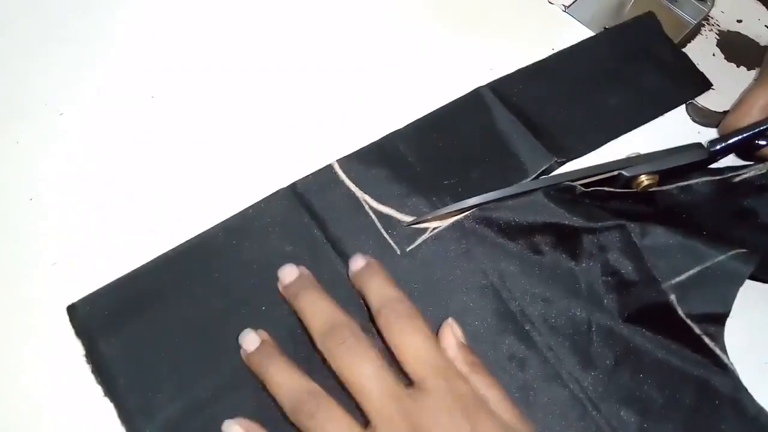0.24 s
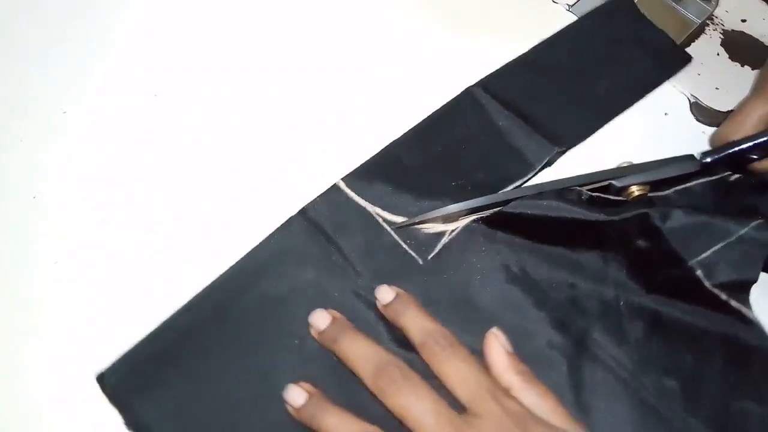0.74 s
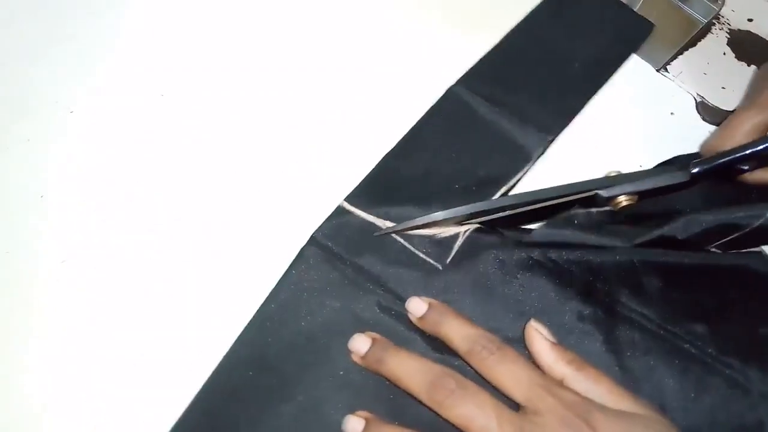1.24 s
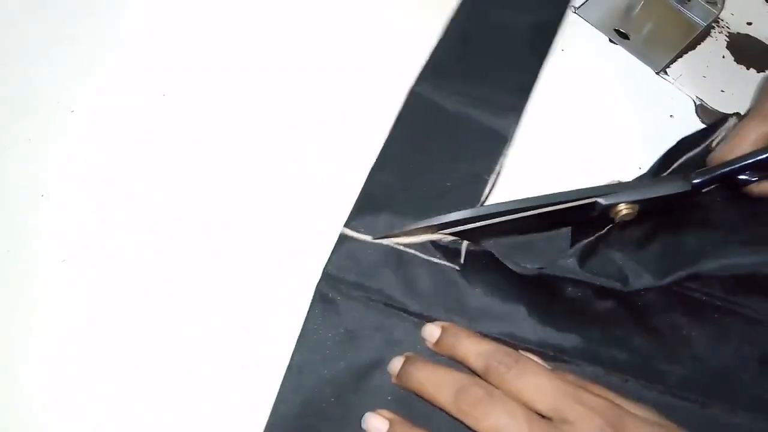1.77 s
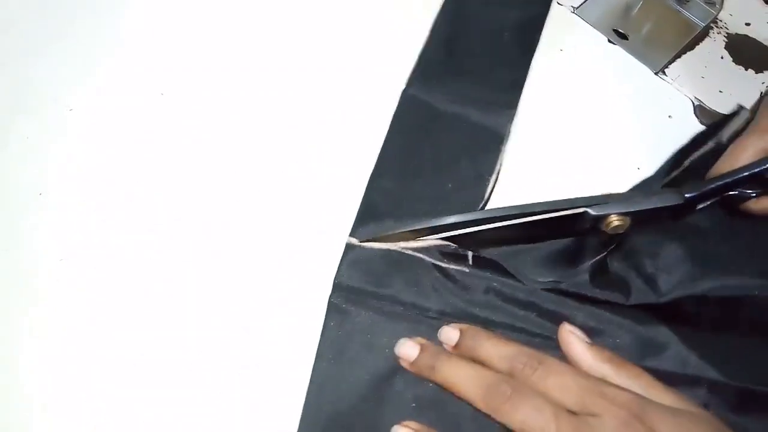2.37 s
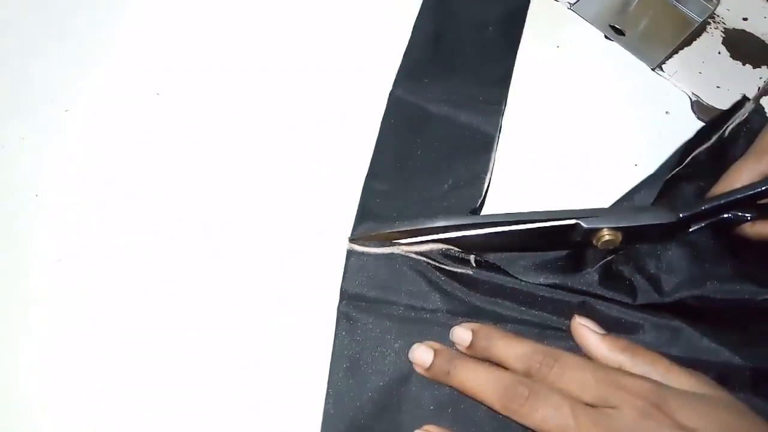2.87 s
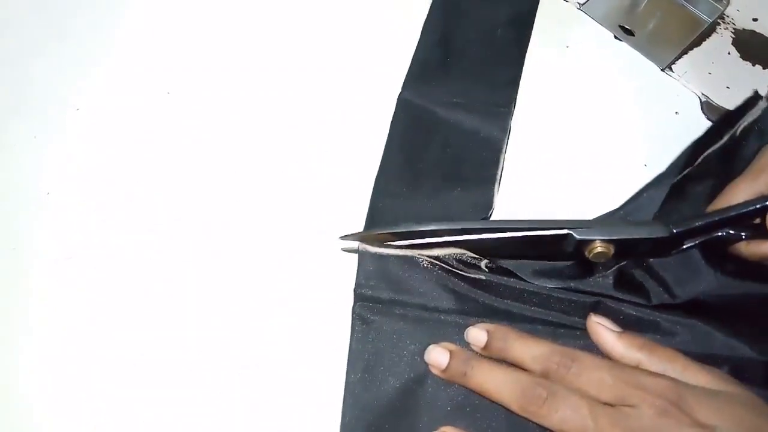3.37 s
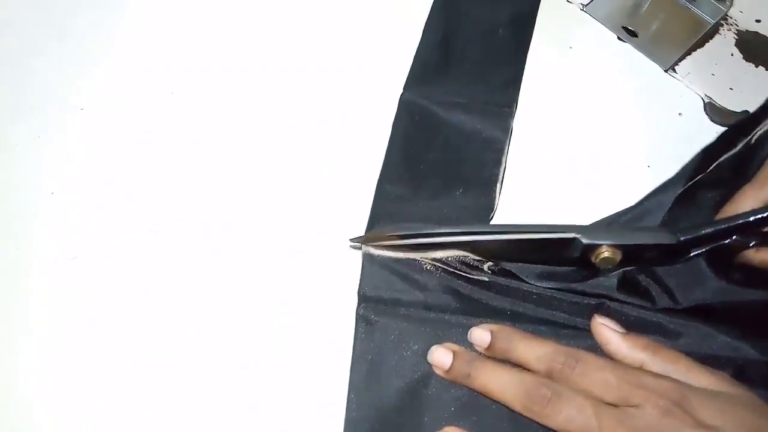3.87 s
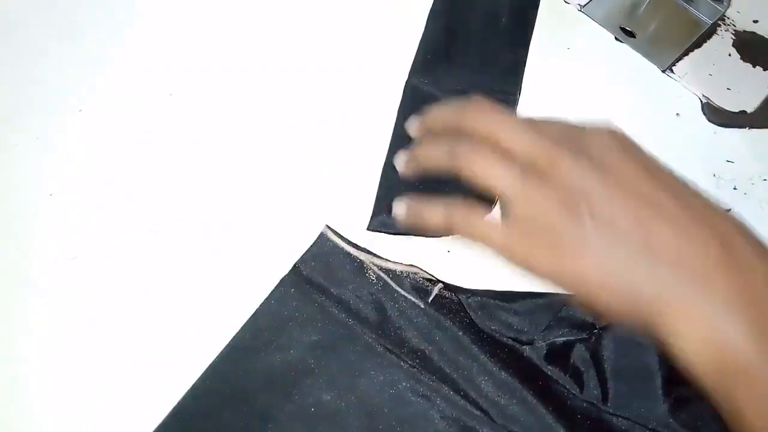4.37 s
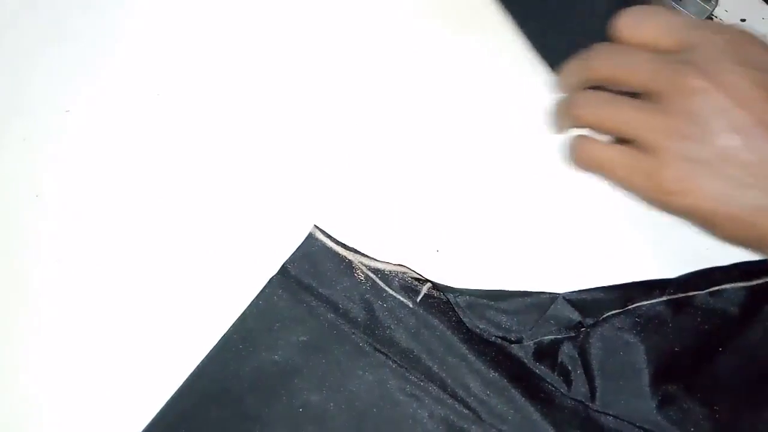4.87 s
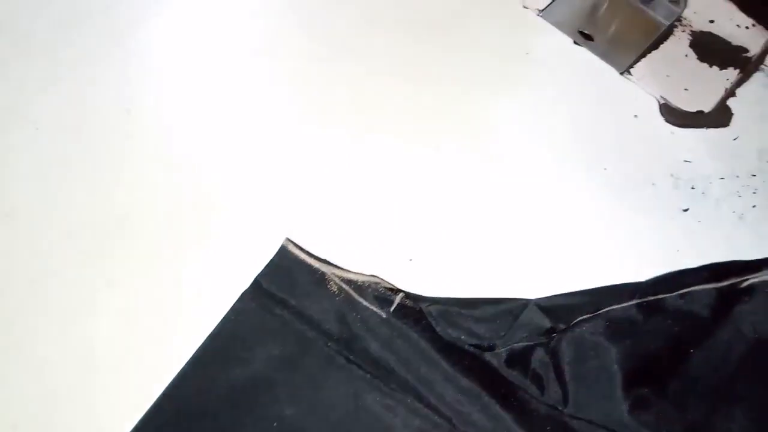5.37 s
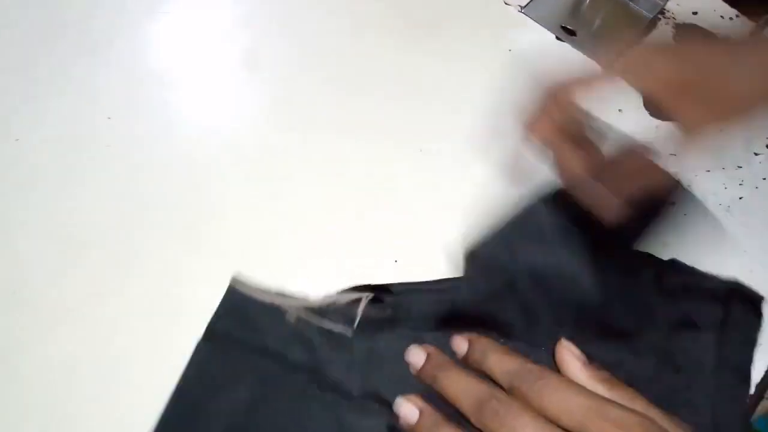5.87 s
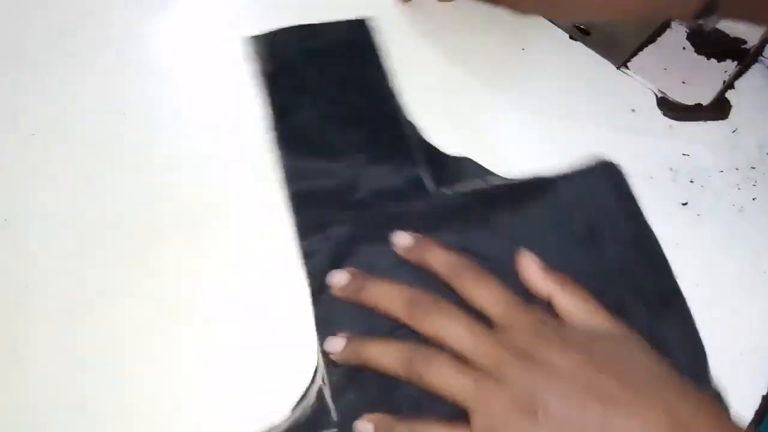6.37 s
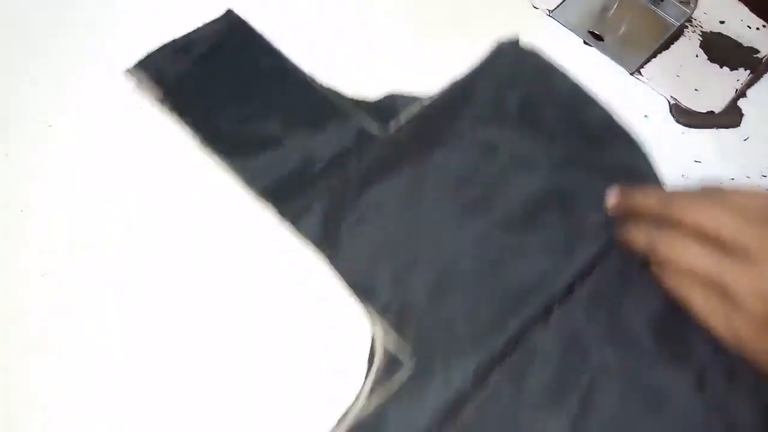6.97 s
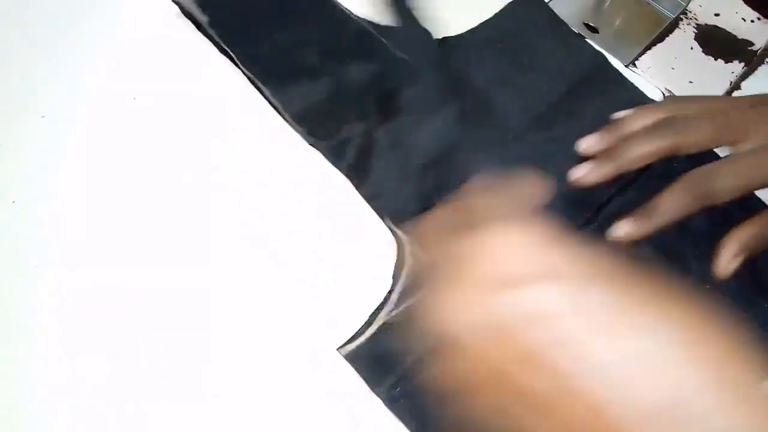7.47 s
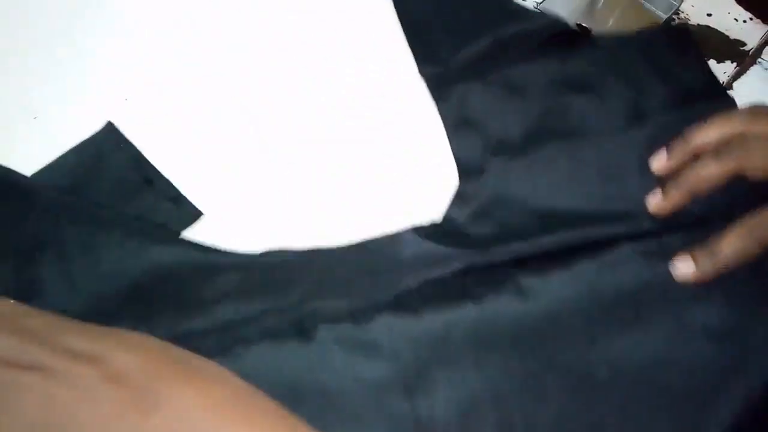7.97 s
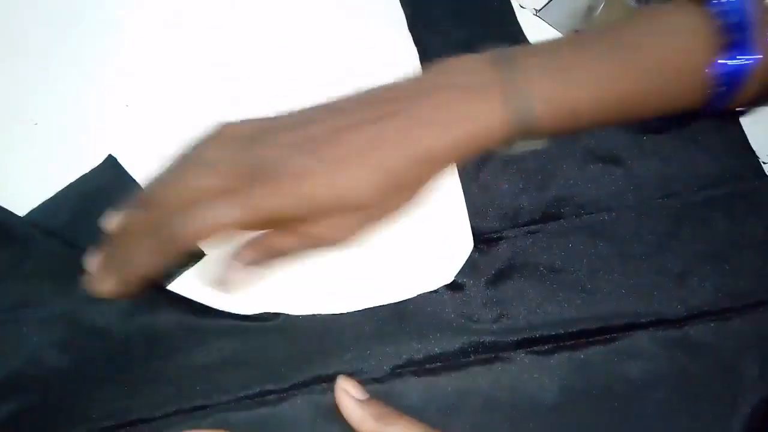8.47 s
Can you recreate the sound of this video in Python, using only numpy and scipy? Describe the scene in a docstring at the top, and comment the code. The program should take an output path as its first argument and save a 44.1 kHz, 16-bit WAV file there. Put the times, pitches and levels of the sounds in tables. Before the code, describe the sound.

A very quiet small room, heard close to a hard table. From about 0.2 s, heavy shears crunch faintly through cloth; further short gritty bursts come near 0.8-1.0, 1.4-1.6, 2.1-2.25 and 2.7-2.8 s, gradually firmer, with light cloth rubs between. From 3.3 s the bites are stronger and more widely spaced, with low blade scraping, until crisp final snips and a snap at 3.9 s and a small springing tick at 4.0. Cloth slides softly; bangles tick at 4.6 and metal clicks at 4.8. At 5.0-5.2 s the shears clatter down, loud, steely and bouncing. After a pause, soft pats and rustles begin near 6 s, with bright short bangle clinks at 6.3 and 6.75-6.8. A hard knock and rapid rattle hit the table at 7.1-7.2 s. Quiet cloth smoothing follows, a sharp bangle clink at 8.3, then a last soft rub.

```python
"""Over faint room tone, tailor's shears crunch through cloth: grains of thread noise excite the blade resonances.
Soft pats, dull knocks and the friction noise of cloth and blade on the table come between.
Bangles clink as decaying modes; the shears clatter down as impacts that ring steel and table modes.
Then hands turn and smooth the cloth, bangles clink again and something hard is nudged across the table top.
A small room adds diffuse reflections."""
import sys
import numpy as np
from scipy import signal
from scipy.fft import rfft, irfft, next_fast_len
from scipy.io import wavfile
from scipy.ndimage import uniform_filter1d

SR = 44100
rng = np.random.default_rng(int(sys.argv[2]) if len(sys.argv) > 2 else 0)


def wav_out(sig):
    """Save sig, one row per channel (or a flat mono array), as 16-bit PCM at SR to the path in sys.argv[1]."""
    wavfile.write(sys.argv[1], SR, np.round(np.clip(np.atleast_2d(sig).T, -1, 1) * 32767).astype(np.int16))


N = 385434  # samples

# Room tone: pitch_hz, level_db
AIR_SPECTRUM = [(12, -37.5), (20, -7), (49, 3), (103, -13.5), (185, -9), (274, -15.5), (362, -10.5),
                (478, -15.5), (686, -16), (834, -18.5), (1270, -17.5), (2760, -26), (4190, -28),
                (9930, -29.5), (15500, -47)]
AIR_DB = -67
# Decay of the room by band: pitch_hz, t60_s
ROOM_DECAY = [(100, .25), (400, .32), (1400, .3), (3000, .29), (7000, .33), (14000, .23)]
CUTOFF_HZ = 15600

# Runs of small bites as the shears close: start_s, end_s, small_bite_level_db (mean at mid run);
# big bites may follow a run
SMALL_BITE_RUNS = [(0.19, 0.311, -68), (0.83, 1.02, -54), (1.394, 1.6, -54), (2.06, 2.26, -50),
                   (2.681, 2.825, -47), (3.265, 3.38, -43.5)]
# Big bites through a thick bundle of threads: time_s, level_db, treble_db (before the tilt scale in bite)
BIG_BITES = [(0.1958, -46, -4), (0.2375, -51.5, -11), (0.266, -50.5, -10), (0.293, -48, -15),
             (0.835, -46.5, -6), (0.848, -48.5, -24), (0.9027, -50, -10), (0.9428, -40, -11),
             (0.986, -45.5, -5), (1.0115, -41.5, -4), (1.4195, -52.5, -9), (1.4747, -47, -9),
             (1.576, -42.5, -4.5), (1.5913, -46.5, -12), (1.6174, -39.5, -8), (1.6416, -50.5, -19),
             (2.1067, -43.5, -8), (2.198, -44.5, -7), (2.217, -40.5, -1), (2.248, -44, -11),
             (2.6884, -47.5, -19), (2.7162, -45.5, -14), (2.75, -45, -5), (2.7837, -42.5, -8),
             (2.82, -45, -6), (3.27, -36.5, -25), (3.347, -38, -9), (3.3994, -36.5, -1.5),
             (3.467, -36.5, 0.5), (3.711, -38, -4), (3.763, -46, -3), (3.861, -38.5, 0), (3.893, -35, 15),
             (3.949, -36, 5)]
# Blade resonances, changing as the crossing runs to the tips: pitch_hz, width_hz, open_db, shut_db
BLADE_MODES = [(680, 110, -1, -2), (1260, 40, 6.5, -3), (1425, 70, 13, 8), (1560, 40, -5, -5),
               (2360, 140, -15, -9), (4633, 110, 1, -2), (5170, 120, -1, -2.5), (5900, 80, -7, -17),
               (7730, 190, -1, -18), (8190, 220, -2, -15.5), (9100, 190, -24, -6), (9420, 600, -14.5, -10),
               (10500, 160, -28, 1), (13450, 170, 5.5, -21)]
# Parting threads: pitch_hz, level_db
CRUNCH_SPECTRUM = [(59, -66), (100, -11), (250, -9), (390, 1), (541, -18), (682, 7), (1020, -12.5),
                   (1460, 0), (1920, -16), (3390, -17), (4560, -6.5), (6810, -13), (10600, -5.5),
                   (15500, -62)]
SMALL_BITES_PER_S, SMALL_HALF_S, SMALL_TREBLE_DB = 60, .0075, -11
BIG_HALF_S = 0.005
SQUEEZE_DB, SCATTER_DB = 2, 2  # small bites: growth as the grip tightens over a run; chance spread

# Pats of hand and cloth on the table: time_s, level_db
PATS = [(0.2, -56), (2.22, -56), (4.612, -52), (6.025, -49), (6.294, -51), (6.315, -55), (6.743, -51.5),
        (6.812, -53), (6.855, -52), (7.224, -39), (8.27, -53), (8.31, -54)]
# Puff of a pat: pitch_hz, level_db
PAT_SPECTRUM = [(40, -4), (110, -5), (330, 0), (550, -4.5), (1200, -13.5), (4000, -33)]

# Dull knocks on the table top: time_s, level_db, upper_mids_db (against the lows), table_thump_db
KNOCKS = [(0.483, -60.5, -4, -5), (3.962, -41, -12, -14), (6.002, -48, -2, -22), (6.396, -50.5, -3, -20),
          (6.5, -44, -6, -19.5), (6.703, -52, 0, -5), (7.118, -22, -4, -20), (7.147, -39, 2, -26),
          (7.163, -27.5, 4, -28), (7.1705, -29, 6, -24), (7.193, -33, 4, -28), (7.201, -31, 4, -26),
          (7.216, -38, 8, -20), (7.223, -36, -3, -15)]
# Modes rung by a knock on the table: pitch_hz, level_db, t60_s
BOARD_MODES = [(580, -20, 0.15), (1170, -12, 0.033), (1330, -6, 0.037), (2500, 5, 0.012), (2950, 3, .012)]
# Dense body of a knock: pitch_hz, level_db
KNOCK_SPECTRUM = [(47, -36.5), (80, -31), (833, 4), (1110, -3), (2440, 1), (2900, -4), (3940, -9.5),
                  (5720, -20), (9270, -36), (15000, -78)]
# Low modes of the table top: pitch_hz, level_db, t60_s
TABLE_MODES = [(120, -16, .28), (178, -15, .24), (320, -12, .06), (470, -6, .05), (552, -1, .08),
               (620, -3, .045)]
# Edge click, metal on metal: pitch_hz, level_db
EDGE_SPECTRUM = [(500, -21.5), (3000, -14.5), (6000, -7.5), (9000, -3), (12000, -6), (15500, -16)]
# Light clicks of the shears in the hand: time_s, level_db
CLICKS = [(4.817, -29), (5.004, -34.5)]
# Modes of the shears in the hand: pitch_hz, level_db, t60_s
HANDLE_MODES = [(1760, 0, 0.035), (2464, 2, 0.03), (3300, 1.5, 0.032), (6600, -6, .05), (8900, -7, .06),
                (9800, -7, .1)]
# Dense body of the blades springing apart: pitch_hz, level_db
TICK_SPECTRUM = [(300, -11), (2400, -5), (3700, -6), (5000, -6), (8000, 1), (10500, -8), (13000, -25)]
# Hollow note of a handle loop on the table: pitch_hz, level_db, t60_s
HOLLOW_MODES = [(613, 0, 0.048)]
SHUT_S, SHUT_DB = 3.9415, -32  # the blades snap shut at the end of the cut
RELEASE_S, RELEASE_DB = 4.011, -36.5  # the blades spring apart after the last cut
THUNK_S, THUNK_DB = 5.0095, -32.5  # a handle loop touches the table

# Hands slide cloth over the table: fastest_s, rise_s, fall_s, rub_db, hiss_db (both before the trim in cloth)
SLIDES = [(1.25, 0.17, 0.17, -67.5, -73), (1.788, .01, .015, -72, -60), (1.97, .12, .2, -54, -62),
          (2.07, 0.14, .08, -59.5, -59.5), (3.003, .01, .015, -68, -66), (4.1, .1, 0.19, -74, -67),
          (4.42, 0.26, 0.52, -65, -83), (4.482, 0.017, 0.014, -49.5, -60), (5.73, .05, .2, -80, -72.5),
          (6.0, 0.19, 0.22, -59, -60), (6.028, 0.016, 0.01, -52.5, -52), (6.184, 0.009, 0.016, -67, -62),
          (7.02, 0.18, 0.27, -70, -67.5), (7.36, 0.052, .08, -63, -64.5), (7.52, 0.23, 0.21, -65.5, -83),
          (7.66, 0.089, 0.094, -64.5, -57), (7.89, .04, .08, -67, -70), (8.01, .2, .2, -67, -71),
          (8.69, 0.19, .17, -59.5, -59.5)]
# Soft rub on the table: pitch_hz, level_db
RUB_SPECTRUM = [(59, -48), (100, -16.5), (230, -13), (260, -4), (313, -4.5), (475, -1.5), (1300, -12.5),
                (1510, -8), (4000, -24), (5200, -51.5), (8800, -120)]
# Fizz of the weave: pitch_hz, level_db
HISS_SPECTRUM = [(1470, -35.5), (2500, -8.5), (3050, -12.5), (4750, -3.5), (5660, -6), (7740, -6),
                 (10500, -8.5), (12200, -16), (15500, -9)]
GLIDE_DB = 20  # a sliding sound gains this much over its rise and loses it over its fall

# The weave zips at a pitch set by its speed: centre_s, level_db, pitch_hz, half_length_s
ZIPS = [(1.25, -69, 1400, .04), (1.98, -59, 560, .045), (2.025, -55, 7500, 0.055), (7.566, -61, 463, 0.029),
        (7.667, -65, 6440, 0.017)]

# The lower blade pushed along the table: hardest_s, rise_s, fall_s, boom_db, scrape_db (before the trim in dragging)
DRAGS = [(1.99, .2, .35, -61, -63), (2.206, .04, 0.061, -59, -53.5), (2.79, 0.084, .08, -62, -60),
         (3.21, .03, .15, -63, -68), (3.3, .06, 0.14, -48.5, -53.5), (3.41, 0.074, 0.11, -55, -41),
         (3.625, 0.035, 0.074, -43.5, -45.5), (3.71, 0.074, 0.24, -49, -49.5),
         (3.9, 0.039, 0.018, -44, -43.5), (3.947, 0.011, 0.078, -49, -47.5)]
# Soft boom of the table: pitch_hz, level_db
BOOM_SPECTRUM = [(15, -20.5), (40, -1), (60, 2.5), (90, -5), (150, -22), (400, -50)]
# Scrape of the blade: pitch_hz, level_db
SCRAPE_SPECTRUM = [(60, -13), (160, -1), (450, -3), (800, -11.5), (1500, -13), (2500, -23.5), (6000, -35),
                   (15000, -48)]

# Bangles graze each other: time_s, level_db, small_share (0-1), contact_half_s, rattle_db (contact)
CLINKS = [(4.613, -37.5, 0, 0.0024, 2), (4.644, -51.5, .05, 0.0026, -3), (6.242, -51.5, 0.1, 0.0026, 2),
          (6.2925, -23.5, 0.02, 0.0027, 1), (6.577, -43, 0.02, 0.0022, 15), (6.714, -52, .6, 0.0013, 14),
          (6.736, -37, 1, 0.0025, 3), (6.747, -26.5, .7, 0.0021, 21), (6.808, -26, 0.01, 0.003, -6),
          (6.817, -37, 0, 0.0029, 2), (6.836, -46, .1, .002, 0), (8.192, -56, 0.84, 0.0041, 12),
          (8.269, -25, 0.95, 0.0026, 0), (8.280, -21, 0.97, 0.0017, -8), (8.285, -24, 0.96, 0.0061, 0)]
# Modes of the larger bangles, before mismatch: pitch_hz, level_db, t60_s
LARGE_BANGLE_MODES = [(1950, -19, .03), (5180, -15, .035), (6080, -11, .04), (6940, -16, .04),
                      (9350, -12, .04), (9800, -6, .045), (10050, -6, .045), (10480, -8, .04),
                      (11150, -8, .04), (11620, 0, .045), (15100, -15, .03)]
# Modes of the smaller bangles, before mismatch: pitch_hz, level_db, t60_s
SMALL_BANGLE_MODES = [(2400, -18, .03), (5050, -26, .04), (6100, -20, .04), (6620, -15, .06),
                      (7030, -11, .09), (8420, -6, .04), (9300, -14, .04), (11000, -12, .06),
                      (12150, -6, .05), (12780, 3, .075), (13380, 1, .07), (15100, -1, .045)]

# Steel lands and bounces: time_s, level_db, edge_click_db, ring_db (last two against the dense body)
CLATTER = [(5.0757, -11, 2.5, -7), (5.0915, -18, -14, 10), (5.1015, -24, -14, 5), (5.1300, -7.5, -7, 5),
           (5.1355, -18, -5, -10), (5.1808, -4.5, 0, 6), (5.2024, -13.5, -16, 14), (5.2098, -20, -18, 6),
           (5.2225, -25, -18, 4)]
# Modes of the shears, damped by the table: pitch_hz, level_db, t60_s
STEEL_MODES = [(900, -16, .035), (1166, -12, .04), (1600, -13, .03), (1830, -11, .03), (2560, -5, .016),
               (2810, 1, .018), (2980, 0, .018), (3180, -3, .016), (3700, -9, .018), (8900, -22, .05),
               (11250, -22, .05), (11950, -22, .05)]
# Dense modes of shears and table: pitch_hz, level_db
LANDING_SPECTRUM = [(35, -46), (60, -19), (180, -24), (230, -24), (533, -11), (1290, -9), (1790, -3),
                    (2360, -8), (2840, -10), (4800, -12), (6000, -18), (9080, -35), (12300, -23),
                    (15500, -38)]


def amp(db):
    """The decibel law: level to amplitude ratio."""
    return 10 ** (np.asarray(db) / 20)


def unit(x):
    """Normalisation to rms 1."""
    return x / np.sqrt(np.mean(x ** 2) + 1e-20)


def read(points, hz):
    """Interpolation: straight lines between the points over log frequency."""
    point_hz, value = np.transpose(points)
    return np.interp(np.log(hz + 1), np.log(point_hz + 1), value)


def add(mix, s, sound):
    """Superposition: sums a sound into the mix from time s."""
    part = mix[max(round(s * SR), 0):][:len(sound)]
    part += sound[:len(part)]


def colour(x, spectrum):
    """Linear filtering: weights x by a spectrum, then brings it to rms 1."""
    size = next_fast_len(len(x))
    gain = amp(read(spectrum, np.fft.rfftfreq(size, 1 / SR)))
    return unit(irfft(rfft(x, size) * gain, size)[:len(x)])


def noise(spectrum, size):
    """Filtered Gaussian noise at rms 1."""
    return colour(rng.standard_normal(size), spectrum)


def grains(per_s, spread_db, size):
    """Shot noise: random tiny snaps, a few much larger than the rest."""
    happens = rng.random(size) < per_s / SR
    boost = amp(spread_db * np.minimum(rng.exponential(1, size), 4))
    return rng.standard_normal(size) * happens * boost


def at_level(x, db, size=260):
    """Short-time rms: sets the level of the loudest few milliseconds."""
    return x * amp(db) / np.sqrt(uniform_filter1d(x ** 2, size).max() + 1e-20)


def ring(modes, t):
    """Modal decay: sinusoids of random phase die exponentially, from about rms 1 at time 0."""
    total = sum(amp(db - 60 * t / t60) * np.sin(2 * np.pi * (hz * t + rng.random()))
                for hz, db, t60 in modes)
    return total / np.sqrt(sum(amp(db) ** 2 for _, db, _ in modes) / 2)


def room_tone():
    """Stationary noise: a steady, mostly low spectrum."""
    return amp(AIR_DB) * noise(AIR_SPECTRUM, N)


def room(x, gap=0.0025, build=0.0081):
    """Diffuse reverberation: reflections build up after a gap (s), then die band by band."""
    hz, t, z = signal.stft(rng.standard_normal(SR * 2 // 3), SR, nperseg=256)
    decay = amp(-60 * t / read(ROOM_DECAY, hz)[:, None])
    tail = signal.istft(z * decay, SR, nperseg=256)[1]
    tail *= np.clip((np.arange(len(tail)) / SR - gap) / build, 0, 1)
    tail = colour(tail, [(100, 9.5), (700, 3), (1800, 3.0), (3000, -3), (4500, 1.0),
                         (8000, -2.5), (14000, -2)])  # (Hz, dB)
    return signal.fftconvolve(x, tail / np.linalg.norm(tail))[:N]


def bite(s, db, treble_db, half, shut, threads_per_s=12000, spread_db=2, blade_db=4, mode_scatter_db=3,
         peak_delay=0.0036, tilt=0.72, usual_treble_db=-5, split_hz=4500):
    """Source and resonator: a swell of snapping threads, heard directly and through the blades."""
    t = np.arange(4096) / SR
    hz, middle = np.fft.rfftfreq(len(t), 1 / SR), t.mean()
    mode_hz, width, open_db, shut_db = np.transpose(BLADE_MODES)
    mode_db = open_db + shut * (shut_db - open_db) + mode_scatter_db * rng.standard_normal(len(BLADE_MODES))
    resonance = (amp(mode_db) / (1 + 2j * (hz[:, None] - mode_hz) / width)).sum(1)
    pressure = 1 / np.cosh(np.clip(1.53 * (t - middle) / half, -50, 50))
    direct = grains(threads_per_s, spread_db, len(t)) * pressure
    through = grains(threads_per_s, spread_db, len(t)) * pressure
    blades = unit(irfft(rfft(through) * resonance))
    sound = colour(direct, CRUNCH_SPECTRUM) + amp(blade_db) * blades
    sound = colour(sound, [(split_hz / 2, 0), (split_hz * 2, tilt * (treble_db - usual_treble_db))])
    return s + peak_delay - middle, at_level(sound, db)


def cutting():
    """Repeated fracture: runs of uneven small bites tend to grow, with big bites among and after them."""
    out = np.zeros(N)
    starts_ends = np.ravel([row[:2] for row in SMALL_BITE_RUNS])
    for s, db, treble_db in BIG_BITES:
        # 0 open, 1 shut; after a run it returns gradually to 0 by the next, and stays 1 after the last
        shut = np.interp(s, starts_ends, np.tile([0, 1], len(SMALL_BITE_RUNS)))
        add(out, *bite(s, db, treble_db, BIG_HALF_S, shut))
    for start, end, db in SMALL_BITE_RUNS:
        count = int((end - start) * SMALL_BITES_PER_S)
        uneven = rng.uniform(-.35, .35, count)
        for shut in (np.arange(count) + .5 + uneven) / count:
            level = db + SQUEEZE_DB * (shut - .5) + SCATTER_DB * rng.standard_normal()
            add(out, *bite(start + shut * (end - start), level, SMALL_TREBLE_DB, SMALL_HALF_S, shut))
    return out


def pats(rise=0.00082, t60=0.062):
    """Heavily damped impact: each soft contact is a low puff with no ring."""
    t, out = np.arange(SR // 5) / SR, np.zeros(N)
    for s, db in PATS:
        envelope = amp(-60 * t / t60) * (1 - np.exp(-t / rise))
        add(out, s, at_level(noise(PAT_SPECTRUM, len(t)) * envelope, db))
    return out


def blow(modes, spectrum, db, edge_db, ring_db, thump_db, rise, t60, snap=0.00023, detune=0.014):
    """Impact excitation: modes ring almost at once; dense body, edge click and table top build over the rise."""
    t = np.arange(SR // 3) / SR
    dense = (noise(spectrum, len(t)) + amp(edge_db) * noise(EDGE_SPECTRUM, len(t))) * amp(-60 * t / t60)
    body = (dense + amp(thump_db) * ring(TABLE_MODES, t)) * (1 - np.exp(-t / rise))
    # each contact loads the struck object at another place and shifts its modes
    loaded = [(hz * (1 + detune * rng.standard_normal()), *rest) for hz, *rest in modes]
    ping = amp(ring_db) * ring(loaded, t) * (1 - np.exp(-t / snap))
    return at_level(body + ping, db)


def tapping(knock_ring_db=-5):
    """Light impacts: table knocks, and the shears snapping shut, springing open, clicking and touching down."""
    out = np.zeros(N)
    for s, db, upper_mids_db, thump_db in KNOCKS:
        knock = blow(BOARD_MODES, KNOCK_SPECTRUM, db, edge_db=-27, ring_db=knock_ring_db,
                     thump_db=thump_db, rise=.0005, t60=.052)
        add(out, s, at_level(colour(knock, [(900, 0), (3000, upper_mids_db)]), db))
    snap_shut = blow(BOARD_MODES, CRUNCH_SPECTRUM, SHUT_DB, edge_db=3, ring_db=-14,
                     thump_db=-14, rise=.003, t60=.035)
    add(out, SHUT_S, snap_shut)
    spring_open = blow(HANDLE_MODES, TICK_SPECTRUM, RELEASE_DB, edge_db=-14, ring_db=-20,
                       thump_db=-26, rise=.0004, t60=0.026)
    add(out, RELEASE_S, spring_open)
    for s, db in CLICKS:
        click = blow(HANDLE_MODES, LANDING_SPECTRUM, db, edge_db=7, ring_db=-4,
                     thump_db=-14, rise=.0016, t60=.026)
        add(out, s, click)
    thunk = blow(HOLLOW_MODES, KNOCK_SPECTRUM, THUNK_DB, edge_db=-15.5, ring_db=16,
                 thump_db=-8, rise=.002, t60=.027)
    add(out, THUNK_S, thunk)
    return out


def sliding(moves, low, high):
    """Sliding friction: each movement gathers speed and slows, swelling a low and a high noise together."""
    low_gain, high_gain = np.zeros((2, N))
    for s, rise, fall, low_db, high_db in moves:
        t = np.arange(-2 * rise, 2 * fall, 1 / SR)
        speed = amp(-GLIDE_DB * np.maximum(-t / rise, t / fall))
        add(low_gain, s + t[0], amp(low_db) * speed)
        add(high_gain, s + t[0], amp(high_db) * speed)
    return low * low_gain + high * high_gain


def cloth(level_db=-1):
    """Granular friction: a soft rub of cloth on the table and the fine fizz of the weave."""
    rub = colour(grains(4000, 2.2, N), RUB_SPECTRUM)
    hiss = colour(grains(9000, 2.5, N), HISS_SPECTRUM)
    return amp(level_db) * sliding(SLIDES, rub, hiss)


def zips(width=0.34, skirt_db=-22):
    """Quasi-periodic friction: threads ticking past in quick succession, as a narrow band of noise."""
    t, out = np.arange(-SR // 4, SR // 4) / SR, np.zeros(N)
    for s, db, hz, half in ZIPS:
        band = noise([(hz / 2, -50), (hz * (1 - width), skirt_db), (hz, 0),
                      (hz * (1 + width), skirt_db), (hz * 2, -50)], len(t))
        add(out, s + t[0], amp(db) * np.exp(-.5 * (t / half) ** 2) * band)
    return out


def dragging(level_db=-1):
    """Friction and radiation: the blade scrapes along the table, which booms softly."""
    boom = noise(BOOM_SPECTRUM, N)
    scrape = colour(grains(5000, 1.5, N), SCRAPE_SPECTRUM)
    return amp(level_db) * sliding(DRAGS, boom, scrape)


def bangles(mismatch_hz=60, rattle_tail=0.4, count=3):
    """Detuned modes: nearly alike bangles rattle for an instant and ring briefly, damped by the wrist."""
    t, out = np.arange(-SR // 50, SR // 4) / SR, np.zeros(N)
    after = np.maximum(t, 0)
    contact = [(150, -9), (1000, -16.5), (3500, -20), (5500, -6.5), (10000, -8.5), (15000, 2.5)]  # (Hz, dB)

    def stack(modes):
        """Superposed modes of several bangles, each mode mistuned by chance."""
        return ring([(hz + mismatch_hz * rng.standard_normal(), db, t60) for hz, db, t60 in modes * count], t)

    for s, db, share, half, rattle_db in CLINKS:
        share = np.clip(share, 0, 1)
        tone = np.sqrt(1 - share) * stack(LARGE_BANGLE_MODES) + np.sqrt(share) * stack(SMALL_BANGLE_MODES)
        rattle = amp(rattle_db) * noise(contact, len(t)) * np.exp(-rattle_tail * after / half)
        closing = np.exp(-((t - after) / half) ** 2)  # swells up to the contact, then stays at 1
        add(out, s + t[0], at_level((tone + rattle) * closing, db))
    return out


def clatter():
    """Repeated impact: the shears drop on the table and bounce."""
    out = np.zeros(N)
    for s, db, edge_db, ring_db in CLATTER:
        landing = blow(STEEL_MODES, LANDING_SPECTRUM, db, edge_db, ring_db,
                       thump_db=-18, rise=0.0025, t60=.027)
        add(out, s, landing)
    return out


def scene():
    """Direct and reverberant sound: the shears land further off, so more of theirs comes by way of the room."""
    near = cutting() + pats() + cloth() + zips() + dragging()
    taps, clinks, shears = tapping(), bangles(), clatter()
    wet = amp(-22.0) * near + amp(-8.0) * shears + amp(-18.0) * taps + amp(-17) * clinks
    return (near + shears + taps + clinks + room(wet) + room_tone())[None]


def record(dry, low_cut_hz=28):
    """Transducer limits: the microphone sheds deep bass and overloads at full scale; then the band limit."""
    high_pass = signal.butter(2, low_cut_hz, "high", fs=SR, output="sos")
    sound = np.clip(signal.sosfilt(high_pass, dry), -1, 1)
    low_pass = signal.firwin(255, CUTOFF_HZ, window=("kaiser", 8), fs=SR)
    return signal.oaconvolve(sound, low_pass[None], "same")


dry = scene()
out = record(dry)
wav_out(out)
```